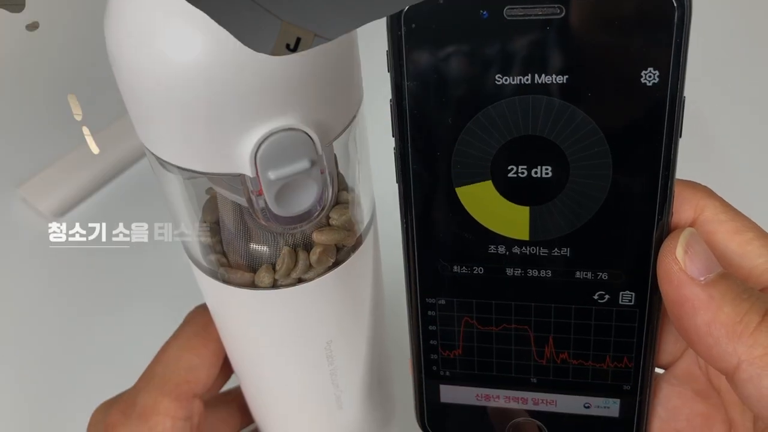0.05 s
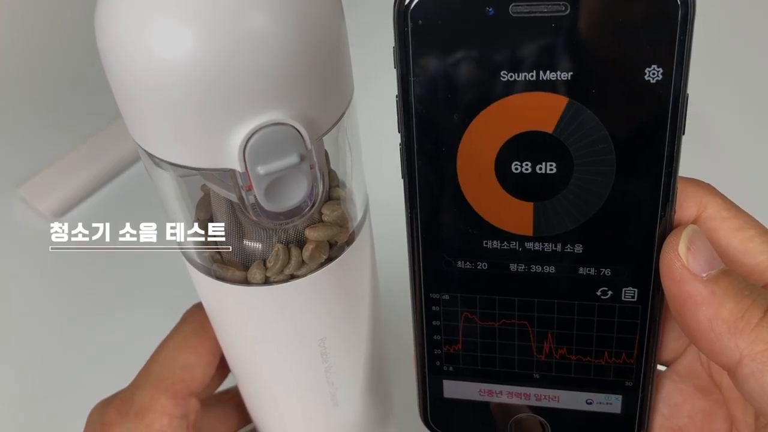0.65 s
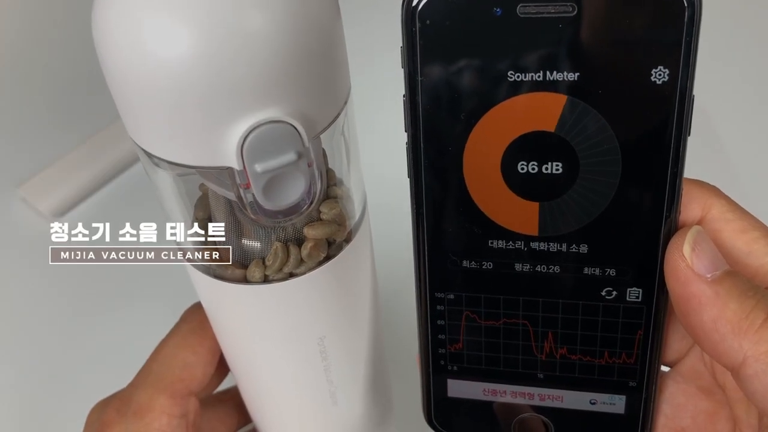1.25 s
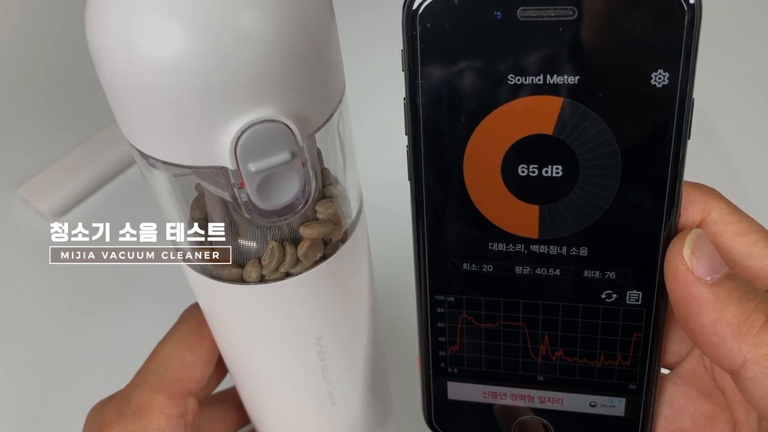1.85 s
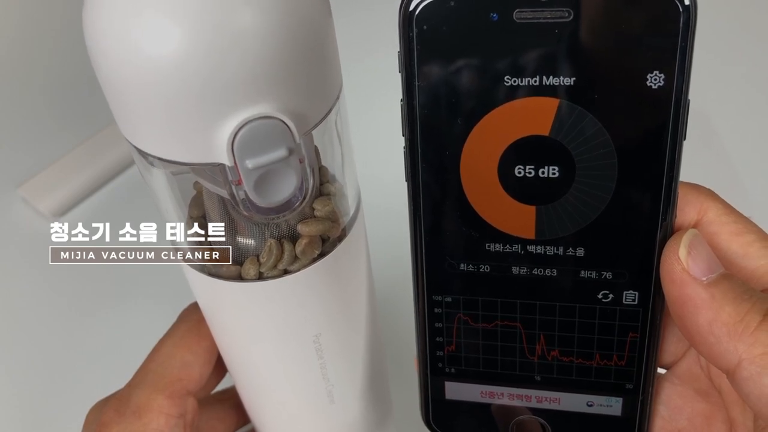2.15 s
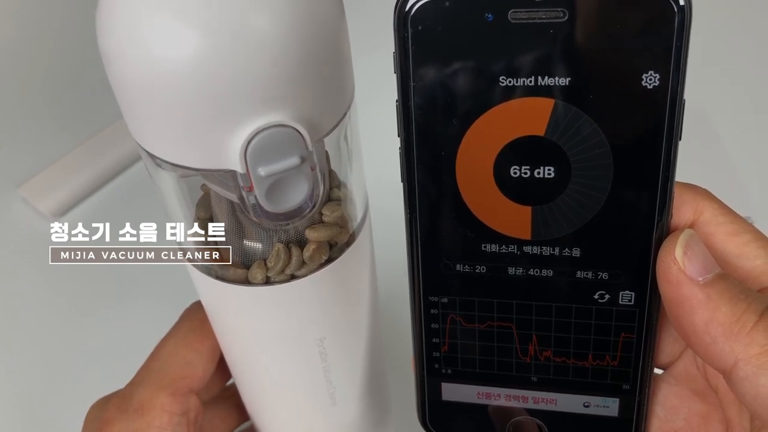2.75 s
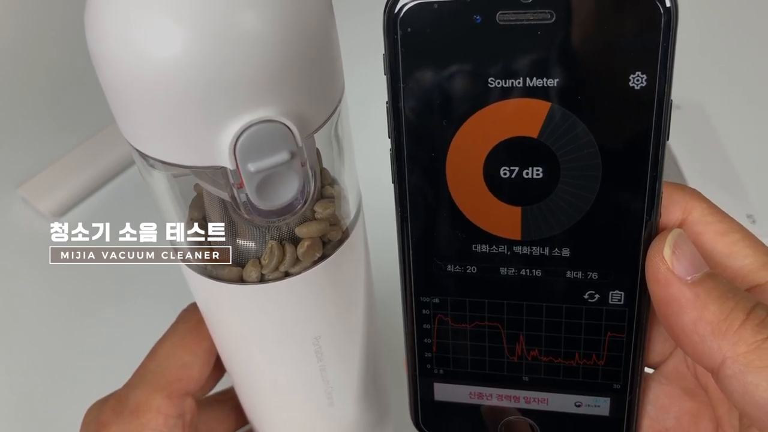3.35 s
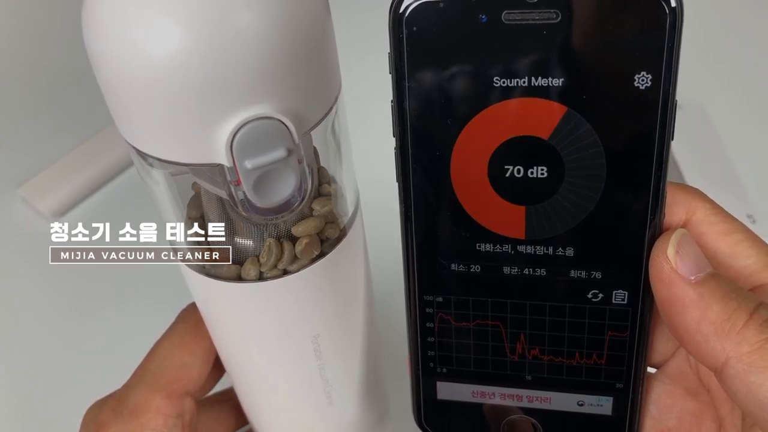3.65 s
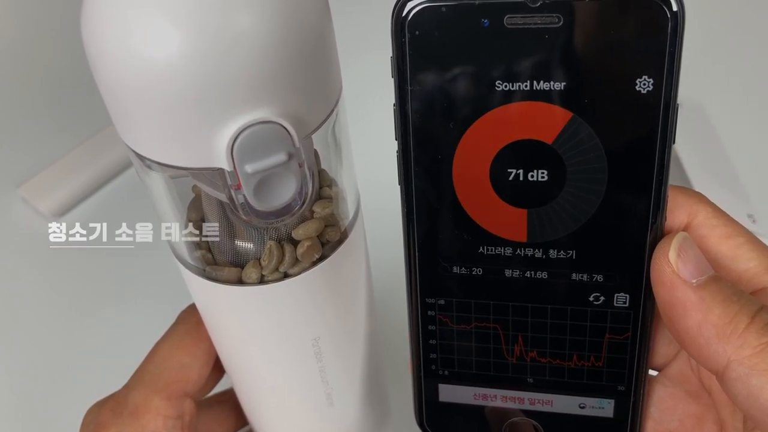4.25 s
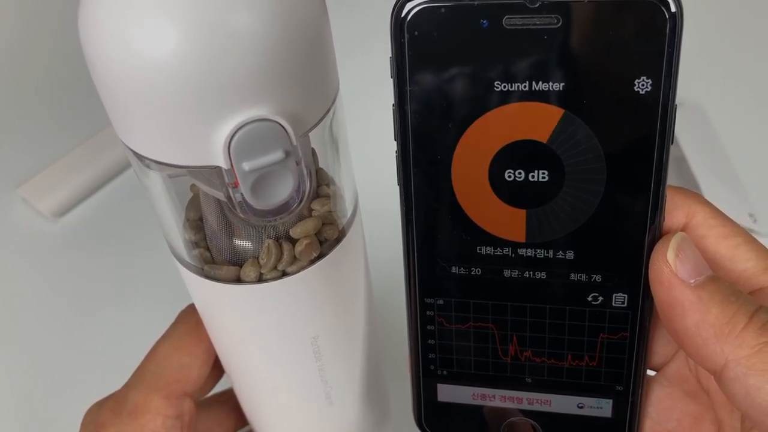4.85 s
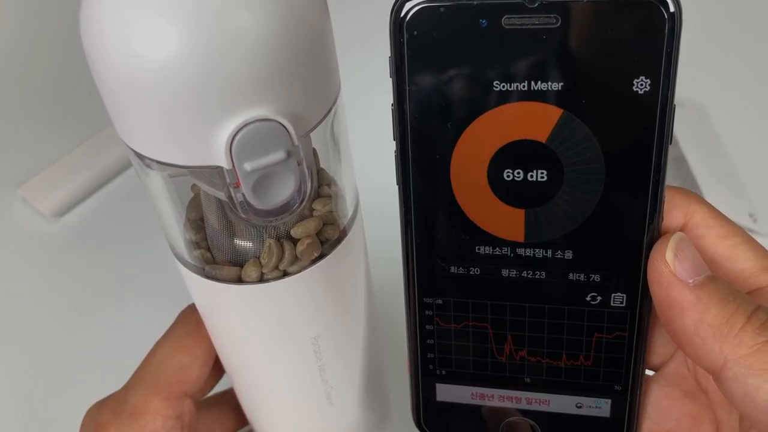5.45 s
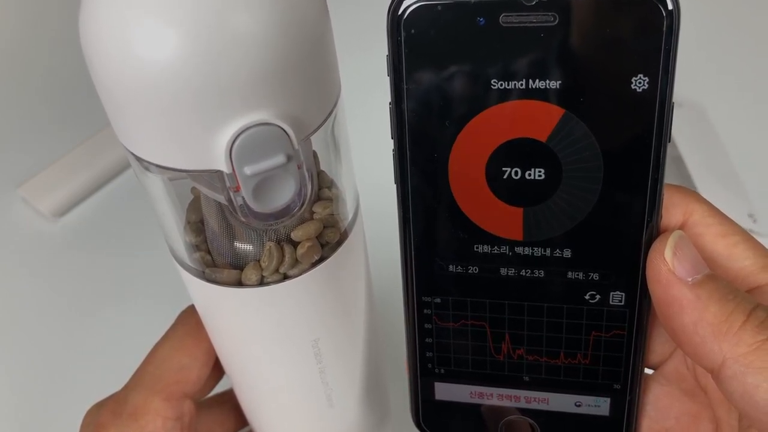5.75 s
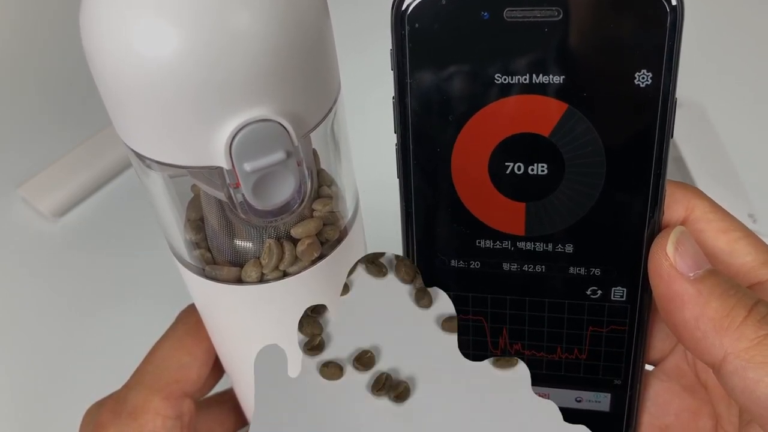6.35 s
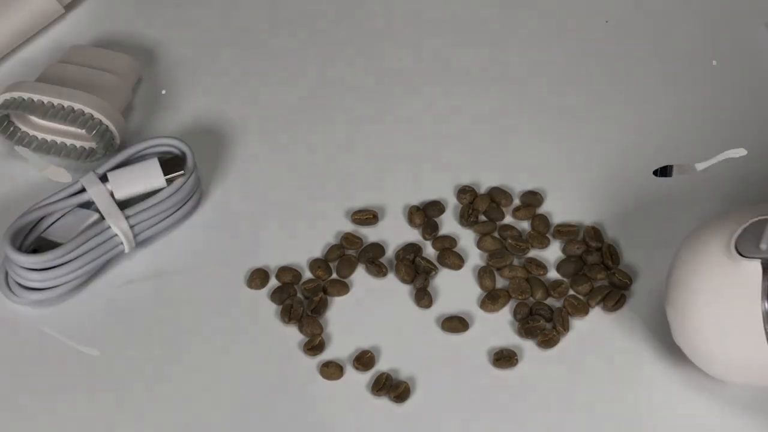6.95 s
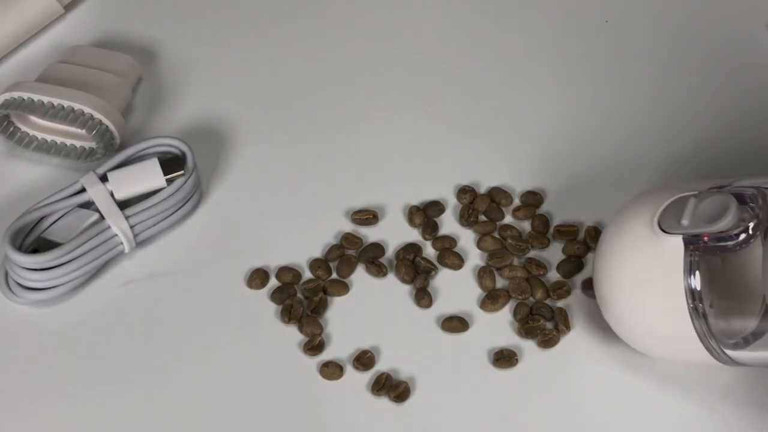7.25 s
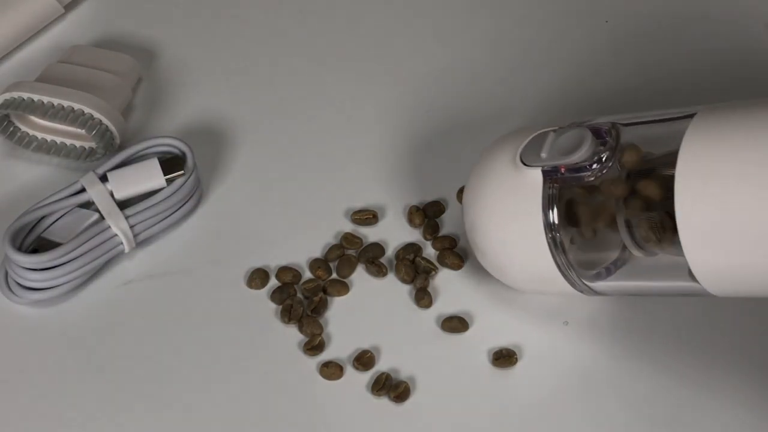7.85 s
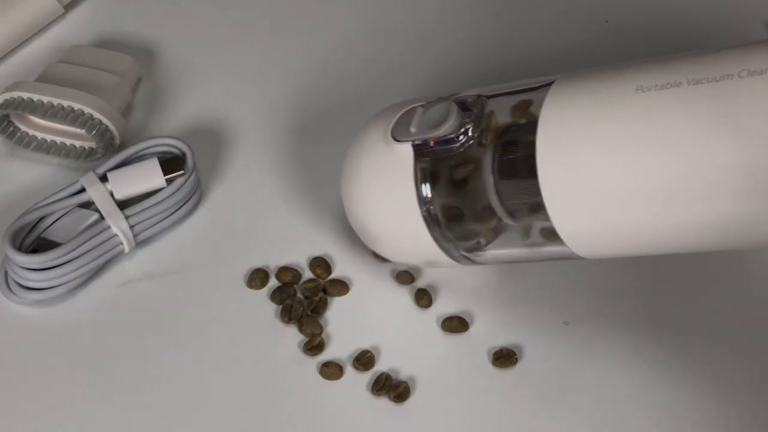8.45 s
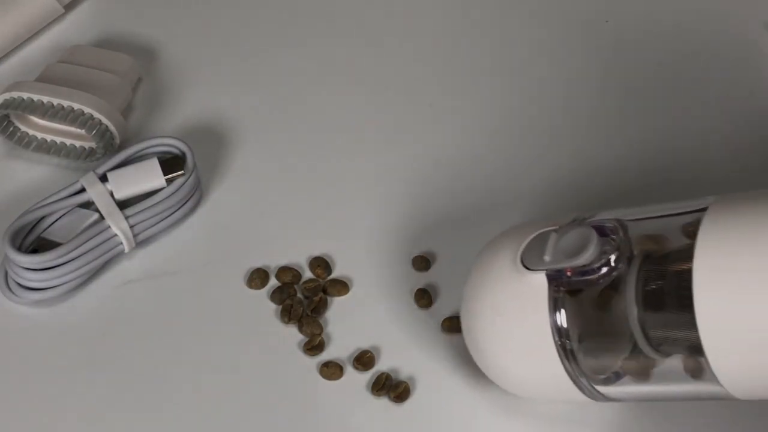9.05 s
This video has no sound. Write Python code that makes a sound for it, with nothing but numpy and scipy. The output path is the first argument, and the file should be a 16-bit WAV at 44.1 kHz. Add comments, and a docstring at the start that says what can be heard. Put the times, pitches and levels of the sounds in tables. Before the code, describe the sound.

A small handheld vacuum clicks on, whines, steps up to a higher speed, then sucks up beans that rattle in its plastic bin.

```python
"""A small handheld vacuum cleaner is switched on, whines at its low setting, then steps up to the high one.
Turbulent air rushes through it. Unbalance makes the shaft hum, the nine-bladed impeller whistles
at its blade-passing frequency, and harmonics flare as they sweep through resonances.
Then the rush of air dips briefly and changes to its on-table colour. Beans thud in through the intake
and rattle around the plastic bin, whose damped modes ring under their impacts."""
import sys
import numpy as np
from scipy import signal
from scipy.fft import rfft, irfft, next_fast_len
from scipy.io import wavfile
from scipy.ndimage import uniform_filter1d

SR = 44100
rng = np.random.default_rng(int(sys.argv[2]) if len(sys.argv) > 2 else 0)


def to_wav(sig):
    """Store sig (one row per channel, or 1-D mono) as 16-bit WAV at the path in sys.argv[1].

    Samples outside -1..1 are clipped; the rate is SR.
    """
    pcm = np.clip(np.atleast_2d(sig), -1, 1) * 32767
    pcm = np.round(pcm).astype(np.int16)
    wavfile.write(sys.argv[1], SR, pcm.T)  # frames by channels


N = 405719

# spectrum of the quiet room: frequency_hz, relative_db
ROOM = [(24, -43), (40, -23), (145, 1), (382, -4), (1390, -15), (1920, -20), (2780, -18), (15000, -17)]
# contacts of the power switch, pressed and settling: start_s, level_db
SWITCH_CONTACTS = [(0.096, -47), (0.109, -63), (0.117, -58), (0.144, -57)]
# modes of the switch: frequency_hz, gain_db, t60_s
SWITCH_RING = [(1600, -16, .02), (2450, -7, .02), (2620, -18, .12), (4700, -10, .012), (5250, -2, .01),
               (7700, -6, .005), (8700, -3, .005), (13000, -1, .008)]
# resonances of the casing: centre_hz, width_hz, relative_db
CASING_MODES = [(260, 120, -9), (506, 170, 2.5), (1340, 810, -11), (2390, 340, -5), (2640, 110, 1),
                (2940, 310, -8), (4150, 300, -4), (4600, 300, -15), (8600, 300, -19)]
# spin-up of the shaft: time_s, speed_hz
SHAFT_SPIN_UP = [(0.15, 60), (0.25, 250), (0.4, 503), (0.47, 599), (0.53, 655), (0.66, 802), (0.78, 875),
                 (0.92, 917), (1.12, 938)]
# the overshoot settles, the high setting, two slight sags: start_s, change_hz, lag_s, steepness
SHAFT_STEPS = [(1.242, -68, .72, 1.41), (2.803, 439.3, .375, 1.336), (4.25, -6.9, .45, 2),
               (6.25, -6.0, .75, 2)]
# spectra of the air at the low setting, at the high one and on the table: frequency_hz, relative_db
LOW_AIR_SPECTRUM = [(40, -35), (80, -22.5), (150, -13.5), (230, -11.5), (400, -6.5), (800, 0.5),
                    (1400, 0.5), (2500, 0.5), (4200, -0.5), (6000, -2.5), (8200, -2.5), (10500, -6),
                    (13500, -6.5), (15600, -13.5)]
HIGH_AIR_SPECTRUM = [(40, -43), (80, -25), (150, -15.5), (230, -13.5), (400, -10.5), (800, -6), (1400, -3),
                     (2500, -2.5), (4200, 1), (6000, -5.5), (8200, -5.5), (10500, -9), (13500, -9),
                     (15600, -15)]
TABLE_AIR_SPECTRUM = [(40, -42), (80, -19), (150, -22), (230, -3.5), (400, -7), (800, -4.5), (1400, 0.5),
                      (2500, 0), (4200, -0.5), (6000, -3.5), (8200, -4.5), (10500, -6.5), (13500, -8.5),
                      (15600, -12.5)]
# peaks and notches in the rushing air, with two narrow whines at the high setting:
# centre_hz, width_hz, low_setting_db, high_setting_db
AIR_PEAKS = [(228, 24, 8.5, 8), (285, 27, 5.5, 3), (656, 51, 0, 3.5), (756, 68, -4.5, -1),
             (1464, 118, -2, 7.5), (1780, 220, -2.5, -2), (2096, 290, 6, 4), (2600, 86, -6, -2),
             (2665, 61, 6, -2), (2834, 560, 5, 4.5), (3350, 110, -7.5, -2.5), (3425, 130, 4, 3),
             (3710, 45, 2, 10.5), (3746, 70, 0, -5.5), (4150, 300, 4, 1), (4480, 74, 7.5, 2),
             (4640, 71, -5, 0.5), (5200, 220, 1, 1.5), (6470, 300, 3, 5.5), (7250, 430, 5, 5),
             (8620, 340, 2.5, 4.5), (10000, 500, 3, 2.5), (11400, 270, 2.5, 5), (12640, 600, 3, 3.5),
             (14100, 560, 3, 6.5)]
# the rush of air dips briefly and changes to its on-table colour: time_s, colour_share, air_change_db
AIR_COLOUR_CHANGE = [(6.38, 0, 0), (6.78, 0.6, -6), (7.25, 0.9, -4), (9.2, 0.85, -4)]
# tones at multiples (orders) of the shaft speed:
# order, low_setting_db, high_setting_db, spin_up_db_per_octave, flutter_db, flutter_hz
ROTOR_HARMONICS = [(1, -59.5, -31.5, -1, 1.0, 24), (2, -54, -36.5, 4, 1.0, 9), (9, -51, -39, 40, 2.0, 18)]
# resonances that the harmonics sweep through: order, centre_hz, width_hz, peak_db
ROTOR_RESONANCES = [(1, 410, 90, -51), (1, 663, 90, -48.5), (1, 850, 12, -42), (1, 938, 33.7, -50),
                    (1, 994, 71, -45), (1, 1136, 47, -41), (1, 1236, 23, -37), (2, 490, 140, -46),
                    (2, 1215, 58, -42), (2, 1450, 70, -48), (2, 2400, 110, -42), (3, 1820, 99, -43),
                    (3, 2625, 68, -43.5), (4, 2420, 150, -45), (4, 2605, 82, -25), (4, 2800, 210, -39),
                    (5, 5400, 250, -42), (9, 4300, 490, -40.5), (9, 7520, 300, -38), (9, 8390, 330, -45),
                    (9, 8750, 220, -44), (9, 10140, 430, -36), (9, 11170, 250, -35), (9, 11620, 170, -33.5)]
# a harmonic fades and returns: order, centre_s, width_s, depth_share
HARMONIC_FADES = [(9, 2.4, 1.2, 0.5), (2, 3.6, .26, .8), (1, 6.675, 0.26, .92), (2, 6.7, 0.14, .85),
                  (9, 6.73, .15, 0.4), (9, 7.6, 1.5, 0.55), (1, 8.1, 2.2, 0.14), (2, 8.33, 1, 0.9)]
# envelope of the beans whirling in the bin: time_s, level_db
WHIRL_ENVELOPE = [(6.98, -70), (7.17, -42), (7.24, -31), (7.41, -25.5), (7.48, -31), (7.55, -26),
                  (8.5, -26), (8.72, -31.5), (9.2, -28.5)]
# modes of the plastic bin: frequency_hz, relative_db, t60_s
BIN_MODES = [(2100, -12.5, 0.0041), (3670, -13.5, 0.0092), (4240, -13, 0.0043), (5650, -12.5, 0.0068),
             (7120, -12, 0.0044), (8430, -5, 0.0031), (8940, -4, 0.002), (9750, -1.5, .003),
             (10550, -1.5, 0.0018), (11600, -6.5, 0.0031), (12600, -6, 0.0022), (14000, -10, .002),
             (15200, -9, .002)]
# spectrum of the tumbling beans: frequency_hz, relative_db
RUMBLE_SPECTRUM = [(40, -44), (80, -22), (125, -6.5), (185, -16), (232, 3.5), (290, -3), (380, -0.5),
                   (520, -6.5), (730, -5), (870, -19), (2000, -40)]
# hardest impacts of beans on the bin wall: start_s, relative_db
HARD_KNOCKS = [(7.0165, -7), (7.0307, -9), (7.1524, -6), (7.198, -5), (7.2215, -6), (7.244, -2.5),
               (7.2776, -7), (7.314, -2), (7.3215, -1), (7.3404, -2.5), (7.3961, 2), (7.428, -2),
               (7.446, -5), (7.5219, 0.5), (7.5385, -1), (7.5543, -5), (7.5664, -6), (7.6, -4),
               (7.6123, -10), (7.6502, 0), (7.672, -7), (7.698, -8), (7.7315, -2), (7.7967, 1), (7.859, -6),
               (7.9118, -7), (7.9698, -1), (8.0073, -6), (8.0249, -5), (8.0403, -6), (8.139, -8),
               (8.2139, -5), (8.289, 1), (8.3368, -2), (8.3758, -5), (8.45, -1), (8.5345, -4), (8.5733, -2),
               (8.6103, -5), (8.6412, -4), (8.678, -4), (8.827, -6.5), (8.8733, -5), (8.8962, -3),
               (9.0114, -4), (9.1134, -5.5), (9.1863, -5)]
# beans passing the intake: start_s, relative_db, pitch_hz
INTAKE_THUDS = [(7.018, -28, 325), (7.069, -32, 246), (7.148, -27.5, 336), (7.221, -26, 231),
                (7.308, -31, 382), (7.369, -29, 333), (7.399, -30, 230), (7.429, -32, 446),
                (7.517, -33, 396), (7.554, -27, 279), (7.69, -26.5, 241), (7.736, -25, 334),
                (7.791, -25.5, 257), (7.814, -29, 423), (7.846, -28, 336), (7.913, -35, 312),
                (7.964, -29, 455), (7.994, -27, 467), (8.029, -32, 272), (8.07, -32, 336),
                (8.129, -33, 232), (8.296, -32, 355), (8.383, -27, 334), (8.445, -27, 403),
                (8.522, -29.5, 243), (8.579, -31, 234), (9.02, -25, 323), (9.189, -30.5, 359)]

LOW_SPEED_HZ, HIGH_SPEED_HZ = 874, 1303   # shaft turns per second at the two settings
TIME_S = np.arange(N) / SR
BINS_HZ = np.maximum(np.arange(N // 2 + 1) * SR / N, 1)


def from_db(db):
    """Amplitude grows tenfold for every 20 dB."""
    return 10 ** (np.asarray(db) / 20)


def unit_power(x):
    """A signal divided by its RMS value has unit power."""
    return x / np.sqrt(np.mean(x ** 2) + 1e-20)


def in_time(rows):
    """Linear interpolation gives each column of a curve at every sample."""
    times, *columns = np.transpose(rows)
    return [np.interp(TIME_S, times, column) for column in columns]


def bell(x, centre, width):
    """A Lorentzian curve, the power response of a resonance; width is taken at half height."""
    return 1 / (1 + (2 * (x - centre) / width) ** 2)


def spectrum_db(points):
    """A spectral envelope, interpolated over logarithmic frequency."""
    hz, db = np.transpose(points)
    return np.interp(np.log(BINS_HZ), np.log(hz), db)


def noise(gain):
    """Filtering colours white noise by a gain at each frequency; the result has unit power."""
    size = next_fast_len(N)
    gain = np.interp(np.arange(size // 2 + 1) * SR / size, BINS_HZ, gain)
    return unit_power(irfft(rfft(rng.standard_normal(size)) * gain, size)[:N])


def drift(rate_hz):
    """Low-passed noise is a slow random fluctuation, here of unit power."""
    return noise(bell(BINS_HZ, 0, 2 * rate_hz))


def impulses(hits):
    """Brief contacts act as impulses, one for each row of start_s, level_db."""
    times, db, *_ = np.transpose(hits)
    out = np.zeros(N)
    out[np.round(times * SR).astype(int)] = from_db(db)
    return out


def ring(force, hz, t60_s):
    """A damped mode answers each impulse with an exponentially decaying sinusoid."""
    radius, angle = from_db(-60 / (t60_s * SR)), 2 * np.pi * hz / SR
    return signal.lfilter([.5, 0, -.5], [1, -2 * radius * np.cos(angle), radius ** 2], force + 1e-18)


def room_noise(level_db=-73):
    """The quiet room is stationary noise, strongest at low frequencies."""
    return from_db(level_db) * noise(from_db(spectrum_db(ROOM)))


def switch_click():
    """Impulse excitation: each contact of the switch sets its modes ringing."""
    press = impulses(SWITCH_CONTACTS)
    return sum(from_db(db) * ring(press, hz, t60_s) for hz, db, t60_s in SWITCH_RING)


def casing_shudder(peak_s=.3, hold_s=0.044, peak_db=-41.5, tremble_db=-73,
                   attack_db_per_s=192, release_db_per_s=49, judder_db=1.0):
    """Forced vibration: the accelerating motor shakes the resonances of the casing in uneven jolts."""
    response = sum(from_db(db) * bell(BINS_HZ, hz, width) for hz, width, db in CASING_MODES)
    t = TIME_S - peak_s
    attack_db = np.maximum(tremble_db, peak_db + attack_db_per_s * np.minimum(t, 0))
    release_db = release_db_per_s * np.maximum(t - hold_s, 0)
    switched_on = TIME_S > SWITCH_CONTACTS[0][0]
    return switched_on * from_db(attack_db - release_db + judder_db * drift(30)) * noise(response)


def shaft_speed():
    """Rotational frequency in Hz: the spin-up, then an S-shaped approach to each new speed."""
    speed = uniform_filter1d(in_time(SHAFT_SPIN_UP)[0], size=1300)
    for start_s, change_hz, lag_s, steepness in SHAFT_STEPS:
        elapsed = np.maximum(TIME_S - start_s, 0) / lag_s
        speed += change_hz * (1 - np.exp(-elapsed ** steepness))
    return speed


def high_share(speed):
    """Normalised speed: zero at the low setting, one at the high one."""
    return np.clip((speed - LOW_SPEED_HZ) / (HIGH_SPEED_HZ - LOW_SPEED_HZ), 0, 1)


def rushing_air(speed, base_db=-25, db_per_octave=13.5,
                low_db=1.06, high_db=1.72, table_db=1.5, gust_db=0.32):
    """Turbulence noise, coloured by peaks and notches, grows as a power of the impeller's speed."""
    low_peaks = sum(db * bell(BINS_HZ, hz, width) for hz, width, db, _ in AIR_PEAKS)
    high_peaks = sum(db * bell(BINS_HZ, hz, width) for hz, width, _, db in AIR_PEAKS)
    low_air = from_db(low_db) * noise(from_db(spectrum_db(LOW_AIR_SPECTRUM) + low_peaks))
    high_air = from_db(high_db) * noise(from_db(spectrum_db(HIGH_AIR_SPECTRUM) + high_peaks))
    # in the on-table colour the peaks stand out less
    table_air = from_db(table_db) * noise(from_db(spectrum_db(TABLE_AIR_SPECTRUM) + 0.036 * high_peaks))
    high = high_share(speed)
    colour_share, change_db = in_time(AIR_COLOUR_CHANGE)
    free_air = np.sqrt(1 - high) * low_air + np.sqrt(high) * high_air   # independent noises add in power
    rush = np.sqrt(1 - colour_share) * free_air + np.sqrt(colour_share) * table_air
    level_db = base_db + db_per_octave * np.log2(speed / HIGH_SPEED_HZ) + change_db
    flowing = np.interp(TIME_S, [.12, .36], [0, 1])   # the air takes a moment to get moving
    return flowing * rush * from_db(level_db + gust_db * drift(7.7))


def rotor_whine(speed, wobble=0.0003, bean_wobble=.0004,
                waver_db=5.5, flare_flutter_db=2.5, bean_flutter_db=-0.5):
    """Unbalance sounds orders 1 and 2, blade passage order 9; turbulence and beans modulate the tones."""
    high = high_share(speed)
    whirl_db, = in_time(WHIRL_ENVELOPE)
    bean_activity = from_db(whirl_db - whirl_db.max())
    speed = speed * (1 + (wobble + bean_wobble * bean_activity) * drift(7.4))
    angle = 2 * np.pi * np.cumsum(speed) / SR
    spin_up_octaves = np.minimum(np.log2(speed / LOW_SPEED_HZ), 0)
    gains = {}
    for order, low_db, high_db, db_per_octave, flutter_db, flutter_hz in ROTOR_HARMONICS:
        steady = from_db(low_db) + (from_db(high_db) - from_db(low_db)) * high ** 2
        gains[order] = steady * from_db(db_per_octave * spin_up_octaves + flutter_db * drift(flutter_hz))
    flicker_db = (flare_flutter_db + bean_flutter_db * bean_activity) * drift(25)
    for order, hz, width, db in ROTOR_RESONANCES:   # a harmonic flares as it crosses a resonance
        flare = from_db(db + flicker_db) * bell(order * speed, hz, width)
        gains[order] = gains.get(order, 0) + flare
    gains[1] *= from_db(waver_db * (1 - high) * drift(9.9))   # the hum wavers at the low setting
    for order, centre_s, width_s, depth in HARMONIC_FADES:
        gains[order] *= 1 - depth * bell(TIME_S, centre_s, width_s) ** 2
    turning = np.interp(TIME_S, [.21, .29], [0, 1])
    return np.sqrt(2) * turning * sum(gain * np.sin(order * angle) for order, gain in gains.items())


def bin_ring(touches):
    """Modal superposition: each touch excites every mode of the bin with a random strength of its own."""
    return sum(from_db(db) * ring(touches * rng.standard_normal(N), hz, t60) for hz, db, t60 in BIN_MODES)


def agitation(hits, decay_s):
    """Relaxation: each hit stirs the other beans, and their motion dies away exponentially."""
    return signal.lfilter([1], [1, -np.exp(-1 / (decay_s * SR))], impulses(hits) + 1e-18)


def bean_rattle(hits, touches_per_s=1100, clump_db=2.5, size_db=0.5, stir_db=-18.0, stir_s=0.0083):
    """Shot noise: circling beans touch the bin wall in random clumps, louder just after each knock."""
    whirl_db, = in_time(WHIRL_ENVELOPE)
    touching = rng.random(N) < touches_per_s * from_db(clump_db * drift(30)) / SR
    sizes = from_db(size_db * np.minimum(rng.exponential(1, N), 2))
    envelope = np.hypot(from_db(whirl_db), from_db(stir_db) * agitation(hits, stir_s))
    return envelope * unit_power(bin_ring(touching * sizes))


def bean_rumble(tumble_db=-39.5, whirl_exponent=1.56, lumpy_db=3.0, stir_db=-8.5, stir_s=0.025):
    """Structure-borne noise: tumbling beans rumble through the body, louder just after each thud."""
    whirl_db, = in_time(WHIRL_ENVELOPE)
    rumble = noise(from_db(spectrum_db(RUMBLE_SPECTRUM))) * from_db(lumpy_db * drift(24))
    tumbling = from_db(tumble_db + whirl_exponent * (whirl_db - whirl_db.max()))
    stirred = from_db(stir_db) * uniform_filter1d(agitation(INTAKE_THUDS, stir_s), size=200)
    return rumble * np.hypot(tumbling, stirred)


def light_knocks(per_s=18, above_whirl_db=18, spread_db=3):
    """A Poisson process of lesser hits that follow the whirl's level: rows of start_s, relative_db."""
    whirl_db, = in_time(WHIRL_ENVELOPE)
    hit = (rng.random(N) < per_s / SR) & (TIME_S > WHIRL_ENVELOPE[0][0])
    db = whirl_db + above_whirl_db + spread_db * rng.standard_normal(N)
    return list(zip(TIME_S[hit], db[hit]))


def bean_knocks(hits, gain_db=-6.0, contact_s=.00009, crack_hz=10700, spread_octaves=0.092,
                clack_db=-15.0, clack_hz=3700, clack_t60_s=.004, skid_db=-8.5, skid_s=0.00087):
    """A brief impact has a wide spectrum: a crack and a lower clack; the bean's skid then rings the bin."""
    impacts, skids = np.zeros((2, N + SR))
    t = np.arange(SR // 100) / SR
    contact = t / contact_s * np.exp(1 - t / contact_s)
    clack = from_db(clack_db - 60 * t / clack_t60_s) * np.sin(2 * np.pi * clack_hz * t)
    pitches = crack_hz * 2 ** (spread_octaves * rng.standard_normal(size=500))
    for (start_s, db), hz in zip(hits, pitches):
        at = round(start_s * SR)
        crack = contact * np.sin(2 * np.pi * hz * t)
        impacts[at:at + len(t)] += from_db(db + gain_db) * (crack + clack)
        skids[at:at + len(t)] += from_db(db + skid_db) * np.exp(-t / skid_s)
    steady_scrape = np.std(bin_ring(np.ones(N)))   # strength of the bin under unbroken rubbing
    return impacts[:N] + bin_ring(skids[:N]) / (2 * steady_scrape)


def intake_thuds(gain_db=0.5, swell_s=0.0045, sag=0.26, sag_s=0.011,
                 tap_db=-1.0, tap_hz=680, tap_t60_s=0.017):
    """A bean in the intake gives a pressure pulse of a few cycles, falling in pitch, and taps the nozzle."""
    out = np.zeros(N + SR)
    t = np.arange(SR // 20) / SR
    envelope = (t / swell_s * np.exp(1 - t / swell_s)) ** 2
    glide = 1 + sag * (2 * np.exp(-t / sag_s) - 1)
    tap = from_db(tap_db - 60 * t / tap_t60_s) * np.sin(2 * np.pi * tap_hz * t)
    tap *= np.minimum(t * tap_hz, 1)   # builds over one cycle
    for start_s, db, hz in INTAKE_THUDS:
        at = round(start_s * SR)
        pulse = envelope * np.sin(2 * np.pi * np.cumsum(hz * glide) / SR)
        out[at:at + len(t)] += from_db(db + gain_db) * (pulse + tap)
    return out[:N]


def scene(body_cutoff_hz=85):
    """Superposition: all sources add at one close spot, alike in both ears."""
    speed = shaft_speed()
    hits = [*HARD_KNOCKS, *light_knocks()]
    beans_in_bin = TIME_S > WHIRL_ENVELOPE[0][0]
    vibration = switch_click() + casing_shudder() + bean_knocks(hits) + intake_thuds()
    vibration += beans_in_bin * (bean_rattle(hits) + bean_rumble())
    # the vibration sounds with little energy below about 85 Hz
    radiated = signal.sosfilt(signal.butter(2, body_cutoff_hz, "high", fs=SR, output="sos"), vibration)
    return np.tile(rotor_whine(speed) + rushing_air(speed) + radiated + room_noise(), (2, 1))


def record(dry, ceiling=0.68, cutoff_hz=15750):
    """Soft saturation rounds the sharpest peaks, and a steep low-pass filter removes the top treble."""
    rounded = ceiling * np.tanh(dry / ceiling)
    return signal.sosfilt(signal.ellip(12, .1, 90, cutoff_hz, fs=SR, output="sos"), rounded)


dry = scene()
out = record(dry)
to_wav(out)
```